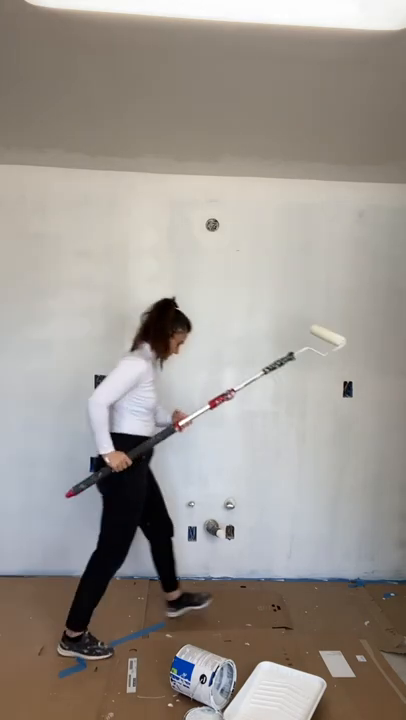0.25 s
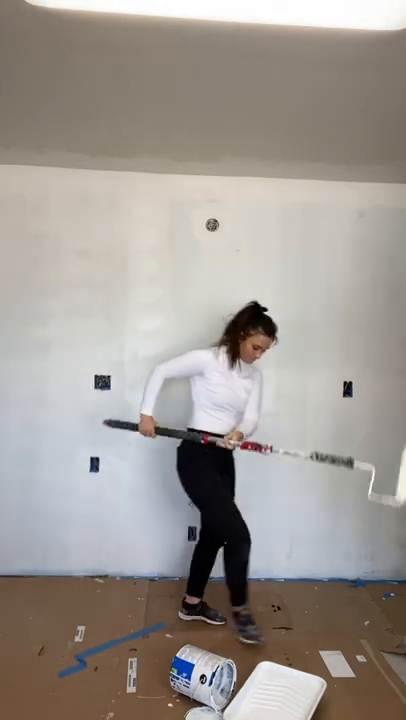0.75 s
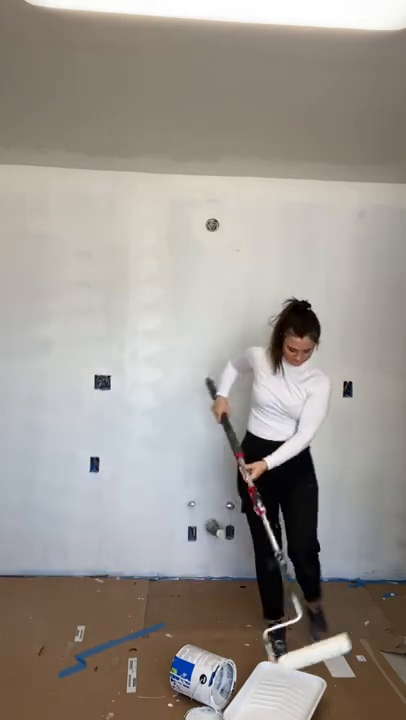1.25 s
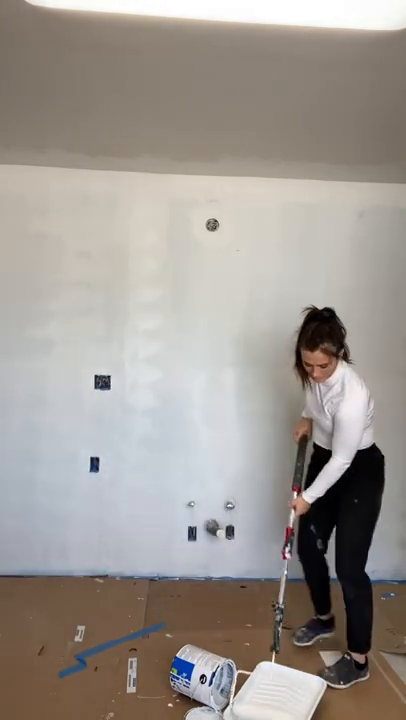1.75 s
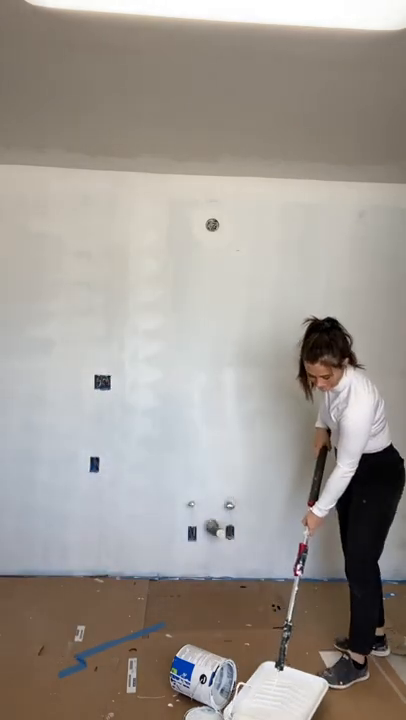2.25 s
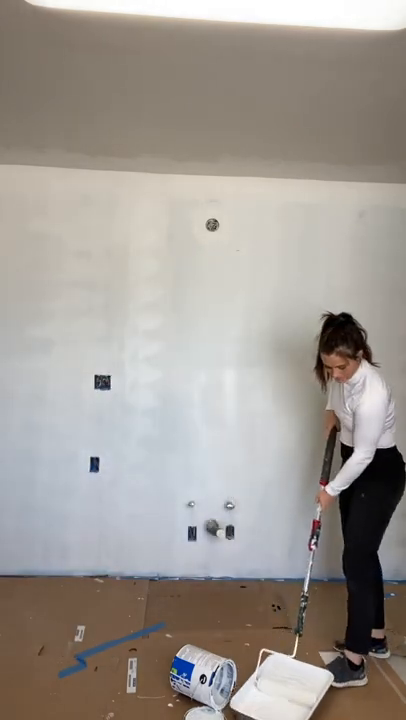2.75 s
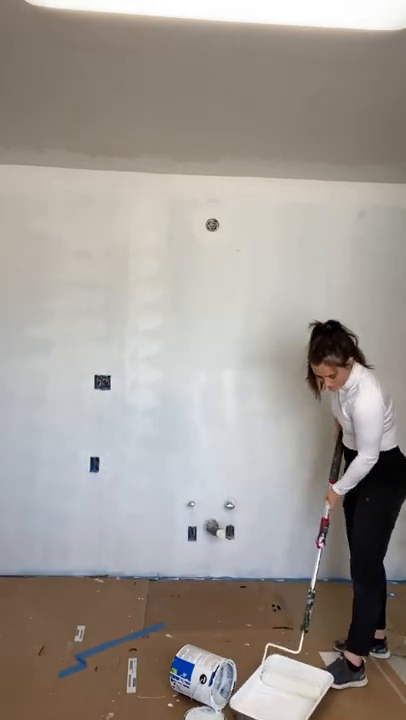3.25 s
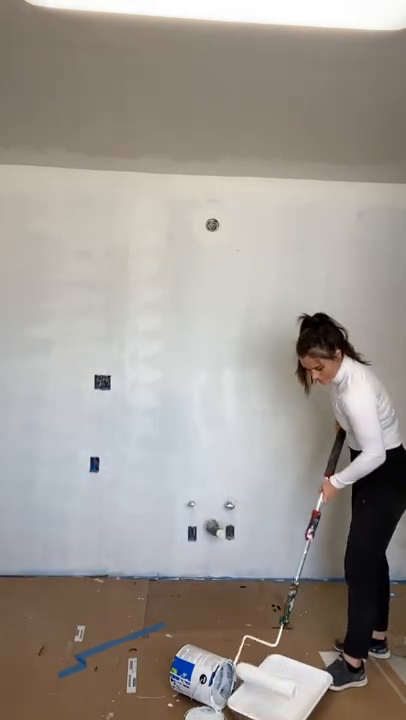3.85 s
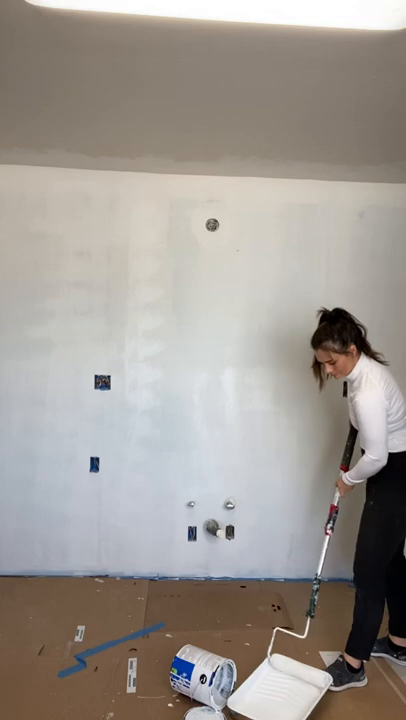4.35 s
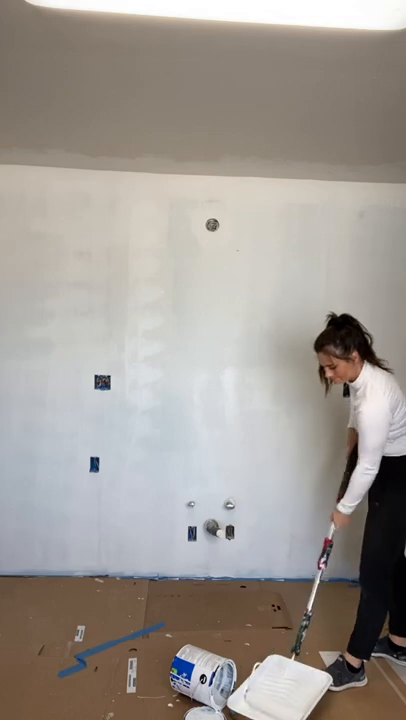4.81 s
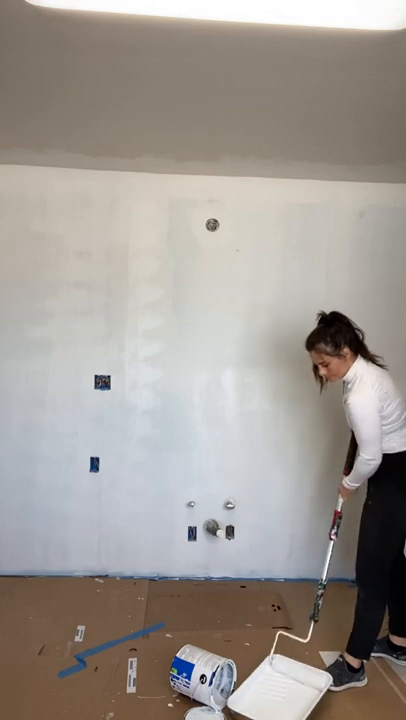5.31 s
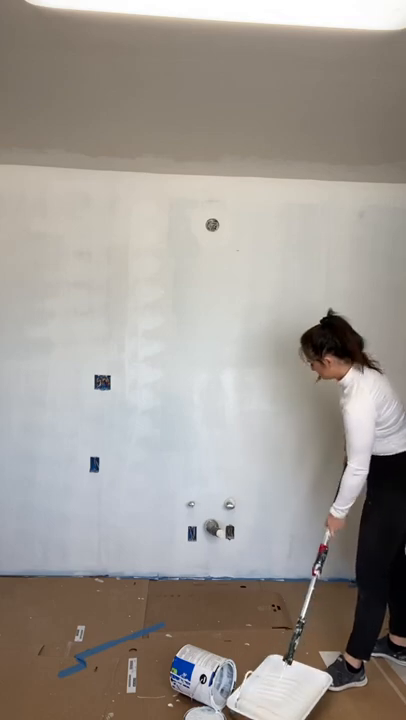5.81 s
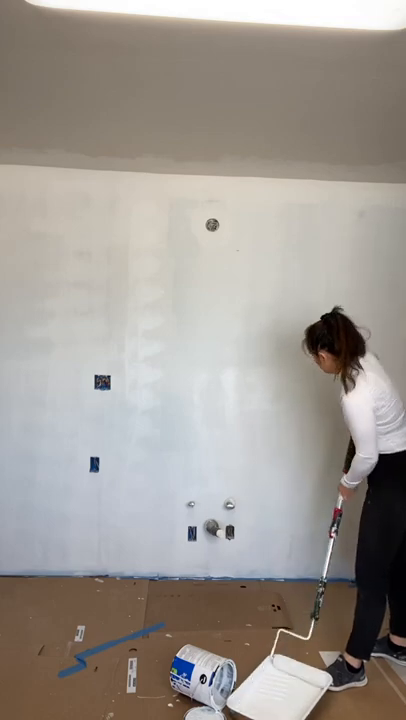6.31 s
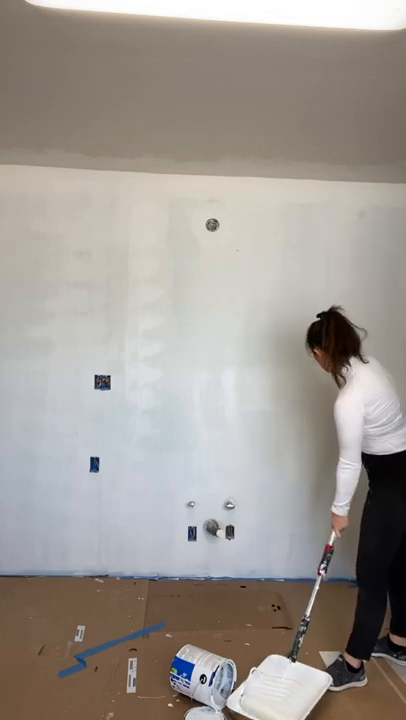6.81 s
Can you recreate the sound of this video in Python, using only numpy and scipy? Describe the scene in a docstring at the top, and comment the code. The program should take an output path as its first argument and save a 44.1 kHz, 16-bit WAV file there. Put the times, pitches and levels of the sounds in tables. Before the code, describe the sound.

Someone walks up over crinkling floor paper, sets a paint roller in a plastic tray, and rubs it back and forth, appliance humming.

```python
"""Bare room with a paper-covered floor: someone walks up and sets a paint roller down in a plastic tray.
Steps, crunches and wet nap are filtered random bursts; strokes rub the ribs and drum the resonant tray.
Frame clacks are short noise contacts, ticks are impulses with a brief ring and faint rattle, bumps are
band-passed judders, thuds resonated noise, slips gliding tones; an appliance hums in sines over air noise.
Two closely spaced microphone ports listen. Table levels are relative, before layer gains and filters."""
import sys
import numpy as np
from scipy import signal
from scipy.fft import rfft, irfft, next_fast_len
from scipy.io import wavfile
from scipy.ndimage import uniform_filter1d

SR = 44100
rng = np.random.default_rng(int(sys.argv[2]) if len(sys.argv) > 2 else 0)


def generate_wav(signal):
    """Clip the signal to [-1, 1] and save it as 16-bit WAV at the path in sys.argv[1]."""
    frames = np.transpose(np.atleast_2d(signal))
    scaled = np.clip(frames, -1, 1) * 32767
    pcm = np.round(scaled).astype(np.int16)
    wavfile.write(sys.argv[1], SR, pcm)


N = 311787
TIME = np.arange(N) / SR


def amp(db):
    """Decibels to linear gain."""
    return 10 ** (np.asarray(db) / 20)


def evened(x):
    """Scales to unit rms."""
    return x / np.sqrt(np.mean(x ** 2) + 1e-20)


def read(points, hz):
    """Interpolates a table on a log-frequency axis."""
    f, value = np.transpose(points)
    return np.interp(np.log(hz + 1), np.log(f), value)


def add(mix, s, db, sound):
    """Places a sound whose energy equals db held for 1/20 s."""
    unit_gain = np.sqrt(SR / 20 / np.sum(sound ** 2))
    part = mix[round(s * SR):][:len(sound)]
    part += (amp(db) * sound * unit_gain)[:len(part)]


def drift(rate_hz):
    """Slow random curve with unit rms, low-passed near rate_hz."""
    size = 4096
    hz = np.fft.rfftfreq(size, TIME[-1] / size)
    slow = irfft(rfft(rng.standard_normal(size)) / (1 + (hz / rate_hz) ** 4), size)
    return np.interp(TIME, np.linspace(0, TIME[-1], size), evened(slow))


def colour(x, points):
    """Causal minimum-phase filter with the given spectrum and unit energy."""
    size = 8192
    log_gain = np.log(amp(read(points, abs(np.fft.fftfreq(size, 1 / SR)))))
    min_phase = np.exp(np.conj(signal.hilbert(log_gain)))
    taps = np.fft.ifft(min_phase).real[:size // 2]
    return signal.oaconvolve(x, taps / np.linalg.norm(taps))[:N]


def resonate(x, hz, width_hz):
    """One resonance of gain one, fixed or moving: shift to zero, one-pole low-pass, shift back."""
    turn = np.exp(2j * np.pi * np.cumsum(hz * np.ones(len(x))) / SR)
    r = np.exp(-np.pi * width_hz / SR)
    return 2 * (turn * signal.lfilter([1 - r], [1, -r], x / turn + 1e-18)).real


def grains(per_s, spread_db):
    """Tiny snaps at random moments, a few much larger than the rest."""
    size = amp(spread_db * np.minimum(rng.exponential(1, N), 4))
    sign = rng.choice([-1, 1], N)
    return size * sign * (rng.random(N) < per_s / SR)


def contact(length_s, abruptness=1):
    """Rough contact: noise that starts at once and dies away; an abrupt one holds, then stops."""
    t = np.arange(SR // 3) / SR
    return rng.standard_normal(len(t)) * np.exp(-np.minimum((t / length_s) ** abruptness, 20))


SPOT_WIDTH_HZ, SPOT_DB = 780, 3


def snap(length_s, hz):
    """Short contact coloured by the broad resonance of the struck spot or crease."""
    rough = contact(length_s)
    return rough + amp(SPOT_DB) * resonate(rough, hz, SPOT_WIDTH_HZ)


def progress(start_s, length_s):
    """How far a movement has come, 0 to 1."""
    return np.clip((TIME - start_s) / length_s, 0, 1)


SPEED_POWER = .75


def arch(u, skew=1):
    """Loudness of a movement from rest to rest: a power of its speed; skew < 1 peaks early, > 1 late."""
    out, moving = np.zeros(N), (u > 0) & (u < 1)
    out[moving] = np.sin(np.pi * u[moving] ** skew) ** SPEED_POWER
    return out


SKID_ATTACK_S = 0.0016


def skid(start_s, decay_s):
    """Loudness of a contact that bites at once and eases off."""
    t = np.maximum(TIME - start_s, 0)
    return np.minimum(t / SKID_ATTACK_S, 1) * np.exp(-np.minimum(t / decay_s, 20))


# bare-room decay: f/Hz, t60/s
ROOM_T60 = [(100, 0.04), (400, 0.5), (1000, 0.69), (3000, 0.56), (7000, .5), (14000, 0.43)]
# reverberant over direct, before each layer's wet_db: f/Hz, ratio/dB
ROOM_DB = [(100, 4.7), (1000, 9.85), (3500, 6.45), (8000, 5.1), (14000, 1.1)]
# likeness of the reverberation at the two ports: f/Hz, correlation/0-1
LIKENESS = [(60, .999), (160, 0.92), (300, 0.88), (650, 0.77), (1200, 0.21), (3000, 0.2), (4400, 0.5),
            (5400, 0.97), (8000, 0.2), (10500, 1), (13000, 1), (15000, 1)]


def room(x, wet_db=0):
    """Direct sound plus a dense decaying tail from bare walls, partly alike at the two ports; keeps rms."""
    hz, t, (a, b) = signal.stft(rng.standard_normal((2, SR)), SR, nperseg=512)
    same = np.clip(read(LIKENESS, hz), -1, 1)[:, None]
    t60 = read(ROOM_T60, hz)[:, None]
    wet = amp(read(ROOM_DB, hz) + wet_db)[:, None]
    decay = np.exp(-np.log(1000) * t / t60) * np.sqrt(2 * np.log(1000) / t60 / SR)
    ports = np.array([a, same * a + np.sqrt(1 - same ** 2) * b])
    tail = signal.istft(ports * wet * decay, SR, nperseg=512)[1]
    tail *= np.minimum(np.arange(tail.shape[1]) / SR / 0.0035, 1)  # reflections build up over 3.5 ms
    tail[:, 0] += 1  # direct sound
    out = signal.fftconvolve(x[None], tail, axes=1)[:, :N]
    return evened(out) * np.sqrt(np.mean(x ** 2))


# tray resonances: f/Hz, width/Hz, level above the plain wall/dB
TRAY = [(208, 91, 7.5), (499, 57, -5.5), (634, 66, 6), (740, 72, -3), (860, 28, -3), (957, 70, 0.5),
        (1128, 46, 5), (1220, 23, 0), (1310, 80, -2.5), (1460, 52, -3.5), (1965, 160, -1.5), (2480, 40, -8),
        (2700, 99, -8), (3410, 150, -6)]


def tray(x):
    """The plastic tray adds its damped modes to whatever touches it; energy is kept."""
    t = np.arange(SR // 4) / SR
    ring = np.zeros(len(t))
    for hz, width_hz, db in TRAY:
        damped = np.exp(-np.pi * width_hz * t) * np.cos(2 * np.pi * hz * t)
        ring += amp(db) * 2 * np.pi * width_hz / SR * damped
    out = x + signal.oaconvolve(x, ring)[:len(x)]
    return out * np.linalg.norm(x) / np.linalg.norm(out)


# mains hum and motors that run a little slower and beat against it: f/Hz, level/dB
HUM_TONES = [(54.3, -56), (59.3, -59), (60, -49.6), (74, -63), (105.6, -69), (120, -60), (169, -67),
             (217.2, -58), (253.3, -55), (357, -68), (379, -66)]
# moving-air spectrum: f/Hz, density/dB per Hz
AIR_SPECTRUM = [(20, -23), (42, -2.5), (60, -7), (73, 3.5), (95, -6), (135, -3), (200, -1.5), (370, -2),
                (500, -10.5), (1000, -17.5), (2200, -25.5), (4000, -31), (8000, -39), (15000, -50)]


def hum():
    """Appliance tones, drifting slightly in level and phase, over the rush of moving air."""
    tones = np.zeros(N)
    for hz, db in HUM_TONES:
        level = amp(db + .5 * drift(2.3)) * np.sqrt(2)
        phase = 2 * np.pi * (hz * TIME + rng.random()) + 0.048 * drift(1.0)
        tones += level * np.sin(phase)
    air = evened(room(colour(rng.standard_normal(N), AIR_SPECTRUM), wet_db=-7.5))
    return amp(0.65) * tones + amp(-49.0) * air


# a sole lands or scuffs on the paper: t/s, level/dB, decay/s
STEPS = [(0.053, -51, 0.03), (0.323, -47.5, 0.044), (0.718, -51, 0.01), (0.797, -44, 0.012),
         (0.856, -44, 0.02), (0.965, -43.5, 0.054), (1.447, -53, 0.016), (1.558, -48.5, 0.039)]
# clothes swish with a stride or a swing of the pole: t/s, length/s, level/dB
SWISHES = [(0.07, 0.066, -67), (0.32, 0.079, -60), (0.505, 0.04, -60), (0.785, 0.13, -57.5),
           (0.892, 0.17, -51), (1.03, 0.13, -61), (1.408, 0.075, -60), (1.541, 0.069, -55)]
# floor-paper spectrum, also for crunches: f/Hz, density/dB per Hz
PAPER_SPECTRUM = [(100, -21), (400, -0.5), (800, -4.5), (1300, -2.5), (2200, -3), (4000, -6.5), (6000, -10),
                  (14000, -34)]
# cloth and peeling-paint spectrum, also for rolling: f/Hz, density/dB per Hz
PEEL_SPECTRUM = [(300, -65), (2000, 4.5), (4000, 4.5), (6500, 3), (9000, -1), (12000, -1.5), (15500, -5)]


def walking():
    """Soles crush and rub the floor paper in grains while clothes swish in finer ones."""
    tread = sum(amp(db) * skid(s, decay_s) for s, db, decay_s in STEPS)
    swish = sum(amp(db) * arch(progress(s, length_s)) for s, length_s, db in SWISHES)
    soles = tread * amp(-0.7) * evened(colour(grains(2200, 6.8), PAPER_SPECTRUM))
    clothes = swish * amp(4.5) * evened(colour(grains(6600, 3.7), PEEL_SPECTRUM))
    return room(soles + clothes)


# sharp ticks of the pole and frame: t/s, level/dB, f/Hz
TICKS = [(0.0588, -65, 9000), (0.2793, -67, 6000), (0.3598, -55, 7500), (0.524, -57, 8050),
         (0.717, -51, 6950), (0.7913, -52.5, 3500), (1.231, -53.5, 6840), (1.7753, -57, 6500),
         (1.8628, -37, 4000), (2.8603, -63, 9000), (3.052, -59, 9000), (3.1597, -53, 11000),
         (3.5453, -51.5, 10000), (3.580, -48.5, 13000), (3.801, -48.5, 10100), (5.0366, -52.5, 11000),
         (5.128, -54, 12500), (5.1773, -41, 11500), (5.625, -47, 7000), (6.037, -59, 13500),
         (6.201, -61, 10000), (7.015, -51, 7000)]
# tick spectrum: f/Hz, density/dB per Hz
TICK_SPECTRUM = [(200, -18), (1000, 2.5), (4000, 3.5), (7000, 2), (11000, -1.5), (15500, -1.5)]
TICK_WIDTH_HZ, TICK_RING_DB, RATTLE_DB = 3700, -3, -22


def ticks():
    """Play in the pole joints and roller bearing: an impulse, its brief ring and a faint, short rattle."""
    clicks = np.zeros(N)
    for s, db, hz in TICKS:
        click = amp(RATTLE_DB) * contact(0.0035)
        click[0] += 1
        ring = resonate(click, hz, TICK_WIDTH_HZ)
        add(clicks, s, db, click + amp(TICK_RING_DB) * ring)
    return room(colour(clicks, TICK_SPECTRUM), wet_db=-0.5)


# floor paper buckles under a sole: t/s, level/dB, length/s, crease f/Hz
CRUNCHES = [(0.317, -52.5, 0.013, 1940), (0.345, -54.5, 0.018, 1700), (0.717, -51.5, 0.0066, 3000),
            (0.789, -45, 0.012, 1870), (0.853, -47.5, 0.0039, 4300), (0.867, -47, 0.011, 1980),
            (1.232, -58, 0.0028, 1600), (1.442, -48, 0.018, 2640)]
CRINKLE_DB, CRINKLE_SAMPLES = 6, 40


def crunches():
    """Creases in the floor paper give way in short, dry bursts of uneven crinkles."""
    snaps = np.zeros(N)
    for s, db, length_s, hz in CRUNCHES:
        burst = snap(length_s, hz)
        crinkle = evened(uniform_filter1d(rng.standard_normal(len(burst)), CRINKLE_SAMPLES))
        add(snaps, s, db, burst * amp(CRINKLE_DB * crinkle))
    return room(colour(snaps, PAPER_SPECTRUM), wet_db=-3)


# roller or sole sticks and slips: t/s, level/dB, length/s, first f/Hz, last f/Hz, roughness/0-1
SLIPS = [(0.969, -39.5, 0.038, 341, 380, 0.54), (2.333, -51, 0.13, 3290, 3277, 0.08),
         (2.335, -51, 0.063, 1067, 1166, 0.2), (2.443, -47.5, 0.031, 802, 837, 0.3),
         (2.319, -49.5, 0.14, 2800, 2960, 0.66), (2.365, -53, 0.1, 3850, 3650, 0.6),
         (2.435, -46, 0.052, 2530, 2480, 0.22), (2.48, -51, 0.088, 2380, 2320, 0.4),
         (2.561, -46.5, 0.07, 2480, 2574, 0.3), (2.566, -47.5, 0.06, 2950, 3056, 0.38),
         (2.563, -46, 0.089, 1248, 1388, 0.5), (3.551, -49, 0.022, 3480, 3530, 0.44),
         (3.594, -55, 0.046, 3600, 3430, 0.7)]


def slips():
    """Stick and slip: short groans and squeaks whose pitch glides and jitters."""
    squeaks = np.zeros(N)
    for s, db, length_s, first_hz, last_hz, rough in SLIPS:
        count = int(length_s * SR)
        noises = rng.standard_normal((2, SR // 4))
        jitter, shimmer = (evened(uniform_filter1d(v, 60))[:count] for v in noises)
        hz = np.linspace(first_hz, last_hz, count) * (1 + 0.167 * rough * jitter)
        angle = 2 * np.pi * np.cumsum(hz) / SR
        wave = (np.sin(angle) + amp(-17.0) * np.sin(2 * angle)) * (1 + rough * shimmer)
        add(squeaks, s, db, wave * signal.windows.tukey(count, .5))
    return room(squeaks, wet_db=-9.0)


# wire frame strikes the tray or jolts on the pole:
# t/s, level/dB, chatter length/s, brightness corner/Hz, struck-spot f/Hz
CLACKS = [(1.231, -57.5, 0.005, 9000, 1600), (1.776, -51, 0.0062, 9000, 1890),
          (1.862, -34.5, 0.0034, 12100, 3870), (1.868, -32.5, 0.022, 9000, 1050),
          (1.888, -36, 0.016, 10000, 3100), (2.638, -44.5, 0.024, 2500, 1520),
          (3.548, -45, 0.0046, 12000, 3530), (3.801, -53.5, 0.005, 12100, 4430),
          (4.385, -53.5, 0.0026, 3670, 2940), (4.416, -49, 0.015, 2500, 1600),
          (4.716, -46.5, 0.025, 990, 1960), (4.766, -50, 0.0095, 7000, 2380),
          (5.177, -51.5, 0.014, 11700, 1500), (5.238, -48, 0.012, 3000, 1780),
          (6.177, -50.5, 0.0037, 1840, 1610), (6.505, -49, 0.0066, 5000, 2200),
          (7.006, -51, 0.0081, 5010, 1450)]
# clack spectrum: f/Hz, density/dB per Hz
CLACK_SPECTRUM = [(60, 3.5), (180, 3.5), (500, 5.5), (1100, 0.5), (1700, 1.5), (2200, 5), (3900, 3.5),
                  (5000, 5.5), (7000, 1.5), (15000, -18)]


def clacks():
    """The hard frame hits the tray and chatters briefly; a one-pole low-pass sets the brightness."""
    blows = np.zeros(N)
    for s, db, length_s, bright_hz, spot_hz in CLACKS:
        pole = np.exp(-2 * np.pi * bright_hz / SR)
        add(blows, s, db, signal.lfilter([1], [1, -pole], snap(length_s, spot_hz)))
    return room(tray(colour(blows, CLACK_SPECTRUM)), wet_db=-2.5)


# roller pushed down the ribs into the well: t/s, length/s, level/dB, wetness/dB, drumming over rubbing/dB
PUSHES = [(2.318, 0.46, -49.5, 1.5, 2.5), (3.215, 0.36, -48, -2, 0.5), (4.536, 0.49, -51.5, 0, -3.5),
          (5.47, 0.37, -48.7, -2, -4), (6.387, 0.34, -49.5, -1, -3.5)]
# roller drawn back, more lightly: t/s, length/s, level/dB, wetness/dB
PULLS = [(2.08, 0.42, -55, 2.5), (2.662, 0.6, -57.5, -30), (3.985, 0.19, -59, 2), (5.18, 0.2, -49, -5),
         (5.8, 0.28, -59.5, -3), (6.06, 0.25, -51.5, -2.5)]
# roller touches down or catches and skids: t/s, level/dB, decay/s, wetness/dB
SKIDS = [(1.777, -50, 0.59, -4.5), (3.051, -54, 0.062, 0), (3.159, -52.5, 0.03, -4),
         (3.555, -42, 0.025, -8.5), (3.61, -45, 0.046, -14), (3.995, -45.5, 0.045, -3.5),
         (4.386, -41.5, 0.03, -18), (4.414, -40, 0.022, -6), (6.179, -41, 0.02, -17.5),
         (7.006, -49, 0.033, -20)]
PUSH_SKEW, PULL_SKEW = 0.66, 0.87
WELL_DRUM_DB, LIGHT_DRUM_DB = 3.5, -8  # drumming: growth towards the well; share in pulls, skids, creep
TOUCH_S, CREEP_DB, CREEP_WET_DB = 1.87, -67.5, -24  # once in the tray the roller never quite rests


def strokes():
    """Each move sets how hard the roller rubs, how much paint peels and how much the tray drums."""
    moves = [(amp(CREEP_DB) * (TIME > TOUCH_S), CREEP_WET_DB, LIGHT_DRUM_DB)]
    for s, length_s, db, wet_db, drum_db in PUSHES:
        u = progress(s, length_s)
        moves.append((amp(db) * arch(u, PUSH_SKEW), wet_db, drum_db + WELL_DRUM_DB * u))
    for s, length_s, db, wet_db in PULLS:
        moves.append((amp(db) * arch(progress(s, length_s), PULL_SKEW), wet_db, LIGHT_DRUM_DB))
    for s, db, decay_s, wet_db in SKIDS:
        moves.append((amp(db) * skid(s, decay_s), wet_db, LIGHT_DRUM_DB))
    rub = sum(level ** 2 for level, _, _ in moves)
    peel = sum((level * amp(wet_db)) ** 2 for level, wet_db, _ in moves)
    drum = sum((level * amp(drum_db)) ** 2 for level, _, drum_db in moves)
    return np.sqrt([rub, peel, drum])


# rasp resonances: centre f/Hz, width/Hz, level above the plain rub/dB
RASP = [(852, 95, 6), (1330, 92, 3), (2460, 89, 6), (3270, 86, 3.5)]
WANDER, WANDER_HZ = 0.11, 7  # rms of log frequency; rate


def rasp(x):
    """Adds resonances that slide about with the place and pressure of the contact."""
    out = x
    for hz, width_hz, db in RASP:
        moving_hz = hz * np.exp(WANDER * drift(WANDER_HZ))
        out = out + amp(db) * resonate(x, moving_hz, width_hz)
    return out


TRAVEL_HZ = 1.106  # round trips along the tray per second


def travelling(x):
    """Fades to and fro between two reflection patterns, one for each end of the tray."""
    angle = np.pi * TRAVEL_HZ * TIME
    return room(x * np.cos(angle)) + room(x * np.sin(angle))


# wet nap pulls free of the plastic at a turn: t/s, length/s, level/dB
LIFTS = [(4.08, 0.091, -48.5), (4.427, 0.056, -55), (5.075, 0.1, -52), (5.382, 0.048, -54.5),
         (6.02, 0.073, -54.5), (6.8, 0.067, -57.5)]
# spectra of unsticking nap, rubbed ribs, drumming tray: f/Hz, density/dB per Hz
UNSTICK_SPECTRUM = [(1000, -40), (2500, -8), (5000, -1), (8000, 1), (12000, 1), (15500, -2)]
RUB_SPECTRUM = [(150, -38), (700, -8), (1300, -7), (1700, 5.5), (2300, -0.5), (4000, 0), (5200, -7),
                (9000, -27.5)]
DRUM_SPECTRUM = [(80, -8), (250, 0), (450, -3), (700, -2.5), (1100, -11), (1600, -4), (3000, -14.5)]
TACK_DB, TACK_HZ, CATCH_DB, CATCH_HZ = 3.2, 90, 1.6, 45
RIB_GRAINS_PER_S, RIB_SPREAD_DB = 900, 5.6
POPS_PER_S, POP_SPREAD_DB, POPS_DB = 45, 3, -10


def rolling():
    """Paint threads snap behind the nap; the roller rubs and catches on the ribs and drums the tray."""
    rub, peel, drum = strokes()
    tack = amp(TACK_DB * drift(TACK_HZ))  # paint lets go in clumps
    catch = amp(CATCH_DB * np.tanh(drift(CATCH_HZ)))  # ribs grip unevenly
    lift = sum(amp(db) * arch(progress(s, length_s)) for s, length_s, db in LIFTS)
    nap = peel * amp(1.6) * evened(colour(grains(2200, 2.7) * tack, PEEL_SPECTRUM))
    bubbles = evened(colour(grains(POPS_PER_S, POP_SPREAD_DB), PEEL_SPECTRUM))
    pops = peel * amp(POPS_DB) * bubbles
    fizz = lift * amp(1.5) * evened(colour(grains(2200, 3.1) * tack, UNSTICK_SPECTRUM))
    rib_grains = colour(grains(RIB_GRAINS_PER_S, RIB_SPREAD_DB) * tack, RUB_SPECTRUM)
    ribs = rub * catch * amp(0.5) * evened(tray(rasp(rib_grains)))
    body = drum * evened(tray(colour(grains(600, 4.0), DRUM_SPECTRUM)))
    return room(nap + pops + fizz, wet_db=-3.5) + travelling(ribs + body)


# weight shifts on the floor: t/s, level/dB, f/Hz
THUDS = [(1.867, -33, 234), (1.881, -41, 87), (2.652, -43, 97), (2.653, -45, 219), (3.248, -42, 81),
         (4.671, -40, 79.5), (5.186, -52, 85), (5.639, -43.5, 85), (6.52, -44.5, 328)]


def thuds():
    """Dull, short rings of the floor boards: noise through two equal broad resonances."""
    blows = np.zeros(N)
    for s, db, hz in THUDS:
        width_hz = hz * 0.97
        once = resonate(contact(0.072), hz, width_hz)
        add(blows, s, db, resonate(once, hz, width_hz))
    return room(blows, wet_db=-17.5)


JUDDER_HZ, SMEAR_DB = 150, -2  # mean knock rate; rubbing between knocks
BUMP_STOP = 3.8  # how abruptly a judder ends


def judder(rise_s, length_s):
    """Soft, uneven knocks with some rubbing between them; they swell, hold and stop."""
    t = np.arange(SR // 3) / SR
    gaps_s = rng.uniform(.5, 1.5, size=80) / JUDDER_HZ
    knock_times_s = np.cumsum(gaps_s) - gaps_s[0] / 2
    knocks = np.diff(np.searchsorted(knock_times_s, t), prepend=0)
    force = evened(knocks) + amp(SMEAR_DB) * rng.standard_normal(len(t))
    stop = np.exp(-np.minimum((t / length_s) ** BUMP_STOP, 20))
    return force * np.minimum(t / rise_s, 1) * stop


# soft roller bumps in the tray: t/s, level/dB, rise/s, length/s, boom f/Hz, boom width/octaves
BUMPS = [(1.869, -31.5, 0.003, 0.043, 640, 1.5), (2.325, -44.5, 0.012, 0.033, 720, 1.1),
         (2.445, -45.5, 0.0055, 0.04, 740, 1.3), (2.639, -39, 0.012, 0.058, 500, 1.4),
         (3.309, -49, 0.023, 0.081, 560, 1.3), (4.63, -42.5, 0.07, 0.087, 370, 1.3),
         (4.716, -34.3, 0.002, 0.039, 630, 1.35), (4.777, -50, 0.01, 0.035, 850, 1.2),
         (4.834, -47.5, 0.0037, 0.016, 700, 1.3), (5.551, -45, 0.06, 0.06, 400, 1.2),
         (5.623, -36.5, 0.004, 0.037, 660, 1.15), (5.667, -38, 0.003, 0.036, 620, 1.1),
         (5.72, -48, 0.011, 0.054, 420, 1.2), (6.585, -34.5, 0.007, 0.036, 690, 0.85),
         (6.631, -39.5, 0.003, 0.007, 674, 0.5), (6.69, -54, 0.022, 0.053, 744, 0.8)]


def bumps():
    """The padded roller judders in the tray: a hollow band-passed boom without treble."""
    blows = np.zeros(N)
    for s, db, rise_s, length_s, hz, octaves in BUMPS:
        reach = 2 ** (octaves / 2)
        padding = signal.butter(2, [hz / reach, hz * reach], "bandpass", fs=SR, output="sos")
        add(blows, s, db, tray(signal.sosfilt(padding, judder(rise_s, length_s))))
    return room(blows, wet_db=-10.5)


# phase by which the right port leads: f/Hz, lead/rad
LEAD = [(1000, 0), (2400, .9), (4100, .5), (4800, 2.5), (5400, 3.1), (6200, 3.4), (8000, 4.7), (9700, 6.2),
        (11600, 6.5), (15000, 9.3)]


def scene():
    """Sums all sources; treble reaches the right port a little sooner."""
    first_half = hum() + walking() + ticks() + crunches() + slips()
    left, right = first_half + clacks() + rolling() + thuds() + bumps()
    size = next_fast_len(N + SR // 10)
    lead = np.exp(1j * read(LEAD, np.fft.rfftfreq(size, 1 / SR)))
    right_led = irfft(rfft(right, size) * lead, size)[:N]
    return np.array([left * amp(-1.18), right_led * amp(-1.24)])


EDGE_HZ = 15500


def record(dry):
    """The microphone sheds deep rumble below 42 Hz; then the band limit at EDGE_HZ."""
    lean = signal.sosfilt(signal.butter(4, 42, "highpass", fs=SR, output="sos"), dry)
    band_limit = signal.firwin(511, EDGE_HZ, window=("kaiser", 9), fs=SR)
    return signal.oaconvolve(lean, band_limit[None], "same")


dry = scene()
out = record(dry)
generate_wav(out)
```